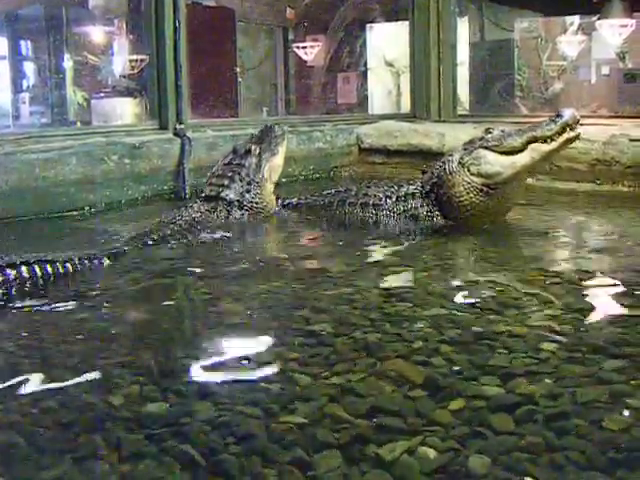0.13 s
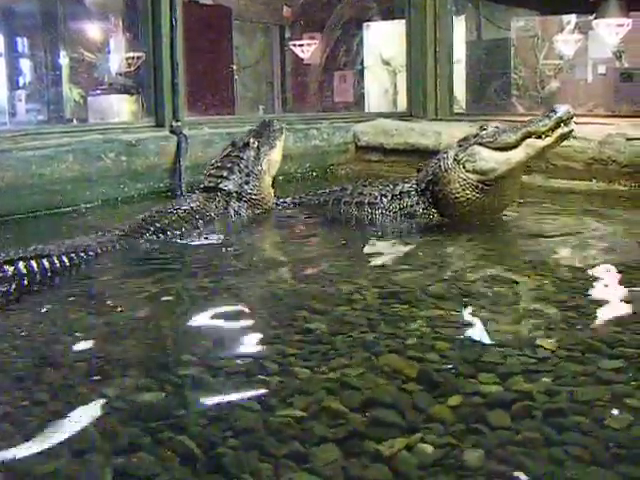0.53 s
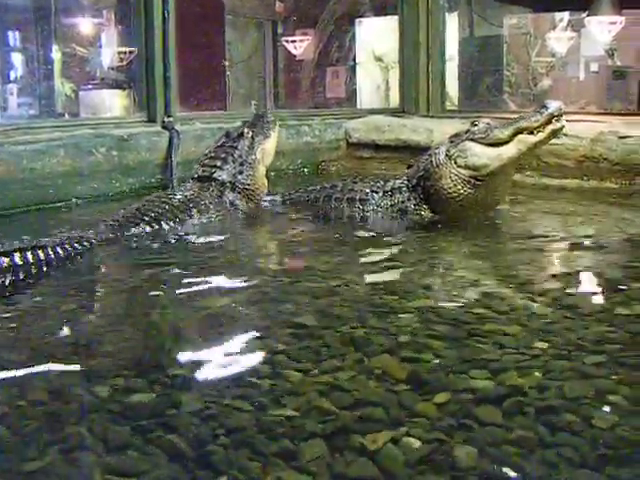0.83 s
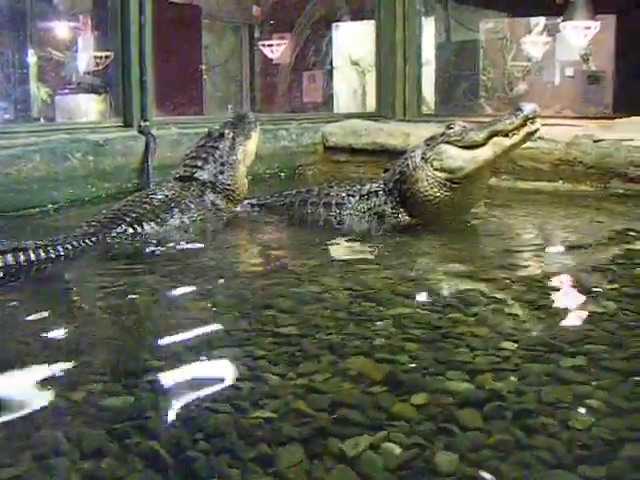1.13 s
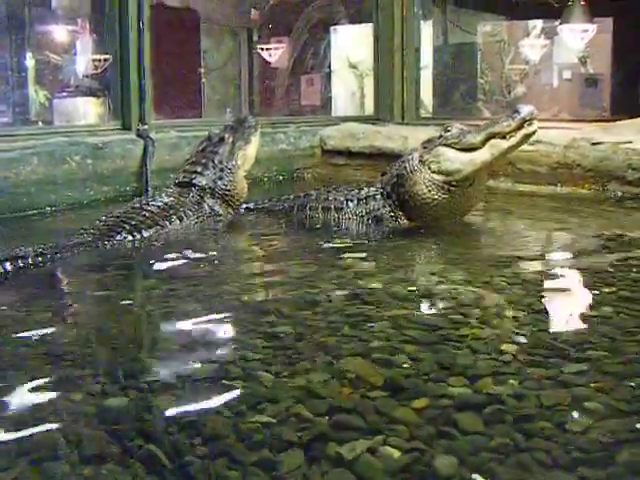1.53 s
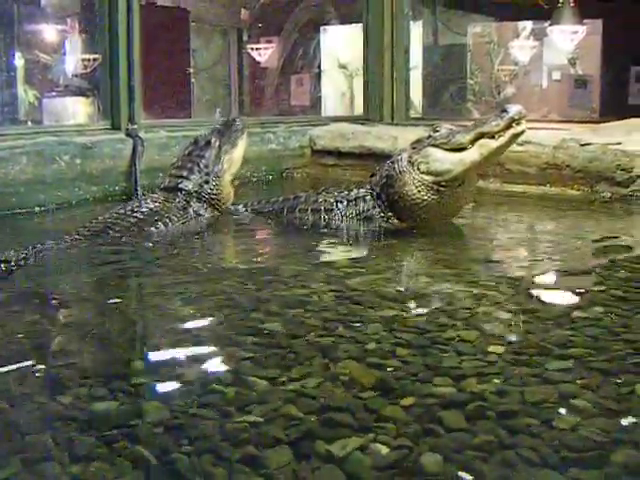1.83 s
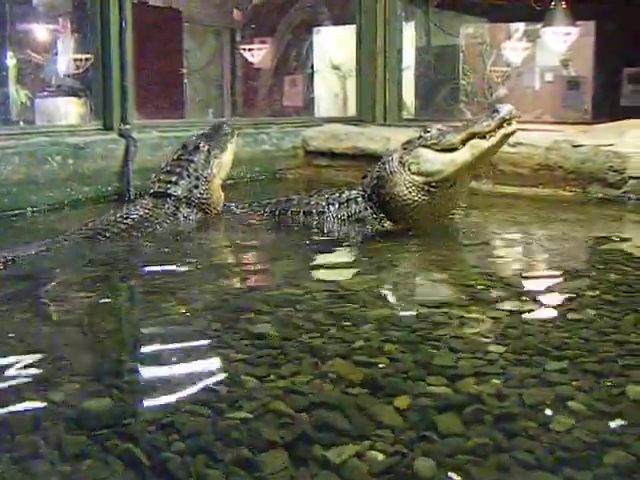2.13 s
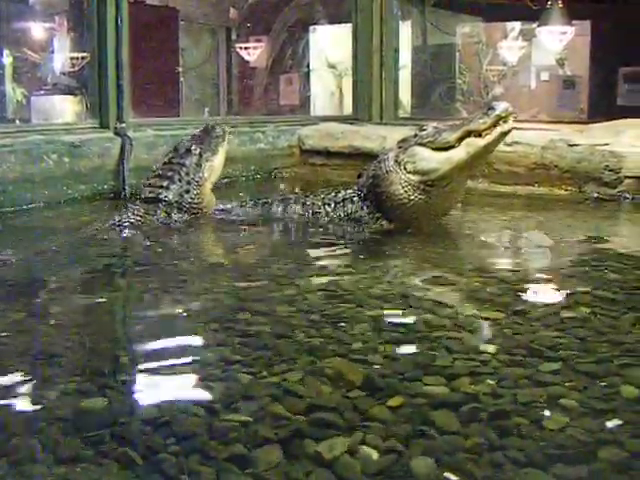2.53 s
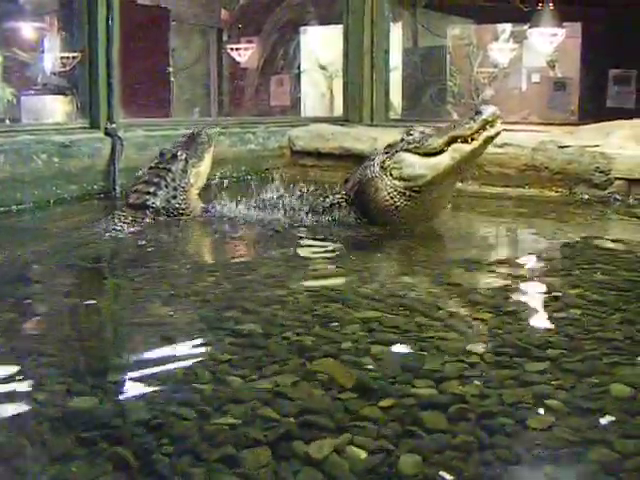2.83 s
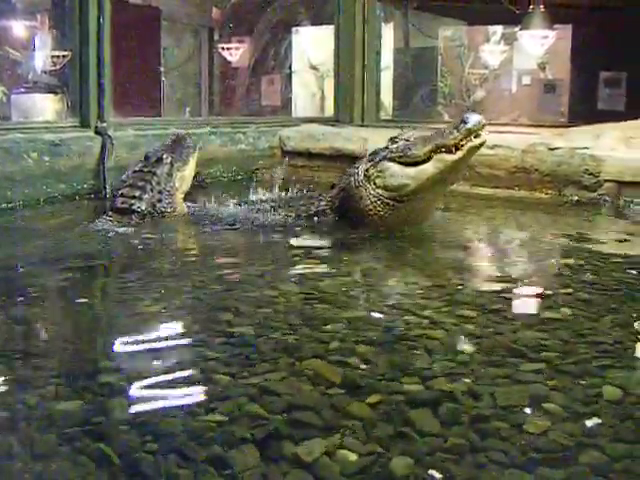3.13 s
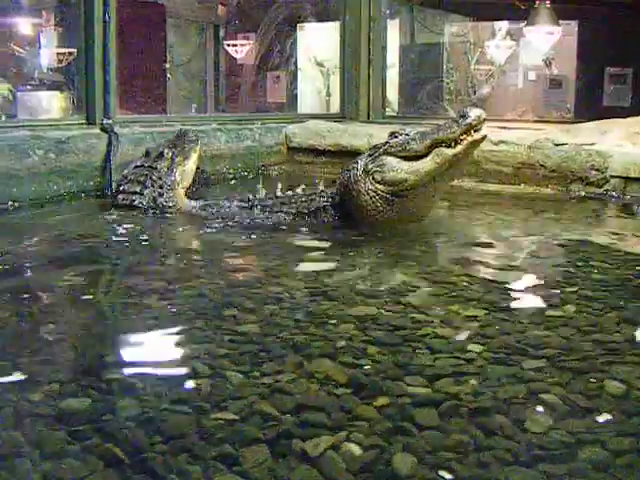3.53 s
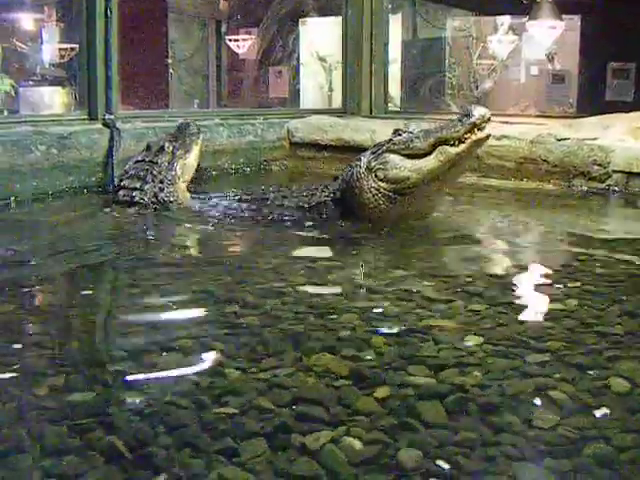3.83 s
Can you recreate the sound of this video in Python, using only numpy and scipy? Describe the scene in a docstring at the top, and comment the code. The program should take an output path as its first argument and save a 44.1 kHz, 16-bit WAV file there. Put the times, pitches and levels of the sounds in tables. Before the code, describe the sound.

An alligator's low, rough bellow builds after a stretch of steady trickling and sharp drips near the microphone. Water plops and fizzes over its throbbing body as the growl rises, sounding dull and slightly echoing in an indoor pool.

```python
"""An indoor pool, where water trickles steadily and a few sharp drips fall close by.
An alligator's body throbs very low, making the water dance and spatter over its back.
Then a hoarse tone in its throat swells into a slow growl, as pulses of air ring its chest and airway.
The water is made of tiny ringing bubbles and bursts of noise. The hall echoes the voice and the spray.
The sound is dull, with almost no treble above 6 kHz; a limiter dips loud moments and tall peaks clip."""
import sys
import numpy as np
from scipy import signal
from scipy.fft import rfft, irfft
from scipy.io import wavfile
from scipy.ndimage import uniform_filter1d, minimum_filter1d

SR = 44100
rng = np.random.default_rng(int(sys.argv[2]) if len(sys.argv) > 2 else 0)


def generate_wav(signal):
    """Clip the signal to [-1, 1] and save it as 16-bit WAV at the path in sys.argv[1]."""
    frames = np.transpose(np.atleast_2d(signal))
    scaled = np.clip(frames, -1, 1) * 32767
    pcm = np.round(scaled).astype(np.int16)
    wavfile.write(sys.argv[1], SR, pcm)


N = 176400
T = np.arange(N) / SR

# how long the hall takes to fade by 60 dB: pitch_hz, fade_s
HALL_FADE = [(150, 0.29), (800, 0.3), (5000, 0.12)]
# tone colour of the even wash of water and room noise: pitch_hz, relative_db
WASH_COLOUR = [(18, -10), (70, -18.5), (90, -14), (120, -17), (170, -13), (197, -9), (225, -10.5), (262, 1),
               (601, -0.5), (994, 3), (1090, -13), (1290, -15.5), (1880, -6.5), (4700, -11.5), (5600, -26),
               (7280, -34.5), (12300, -120)]
# steady resonances in the room's noise: pitch_hz, width_hz, level_db
ROOM_TONES = [(197.3, 13, -60.5), (400.2, 21, -53.5), (617.3, 24, -55.5), (1177, 91, -51.5),
              (1328, 76, -52), (2957, 330, -55)]
# loudness of the trickle: time_s, patter_db, gurgle_db
TRICKLE_LEVELS = [(0, -43, -40), (.12, -39, -44), (.19, -44, -41), (.27, -37.5, -58), (.35, -41, -44),
                  (.42, -39, -40.5), (.52, -44.5, -39.5), (.59, -40.5, -46), (.8, -45, -40),
                  (.96, -42.5, -38.5), (1.05, -37.5, -44), (1.22, -46, -51), (1.32, -41.5, -42),
                  (1.48, -38, -38), (1.63, -41.5, -46), (1.74, -49.5, -77), (1.96, -44.5, -56),
                  (2.07, -48.5, -46), (2.25, -46, -42), (2.45, -43.5, -57.5), (2.68, -42, -45),
                  (4.0, -62, -41.5)]
# tone colour of the trickle's patter: pitch_hz, relative_db
PATTER_COLOUR = [(300, -44), (1200, -12), (1900, -11), (2800, 0.5), (3400, -5.5), (4300, -1.5), (5300, -2),
                 (6000, -14)]
# close drips: start_s, crack_db, crack_hz, knock_db, knock_hz, bubble_db, bubble_hz
DRIPS = [(0.8285, -8, 5000, -17, 2300, -20, 1050), (0.9012, -11, 4700, -8, 2100, -45, 1000),
         (0.9027, -20, 4200, 1, 1380, -26, 1350), (.9038, -2, 4250, -9, 1500, -45, 1000),
         (1.0496, -19, 4700, -36, 2500, -53, 1300), (1.505, -16, 4900, -37, 1700, -29, 800),
         (1.5091, .8, 4950, -7, 1900, -20, 840), (2.9535, -6.5, 4700, -10, 1000, -28, 785),
         (3.278, -10, 4520, -20, 2800, -23, 1295)]
# plops of slopping water: start_s, level_db, pitch_hz
PLOPS = [(.414, -26, 1303), (.875, -26, 994), (1.121, -25.5, 1287), (1.285, -29.5, 1286),
         (1.407, -25, 1295), (1.461, -27, 1316), (1.678, -31.5, 1300), (1.748, -30.5, 1410),
         (2.242, -22, 1056), (2.603, -23.5, 1316), (2.703, -13, 752), (2.726, -13, 862),
         (2.737, -15.5, 798), (2.835, -10.5, 800), (2.849, -11, 960), (2.865, -31, 795),
         (2.909, -20.5, 1030), (3.345, -25, 1310)]
# splashes falling back into the pool: start_s, level_db, pitch_hz, fade_s
SPLASHES = [(0.254, -35, 2980, 0.009), (0.987, -36, 2770, 0.021), (1.286, -32.5, 920, 0.036),
            (1.412, -31.5, 1170, 0.013), (1.99, -35, 3550, 0.04), (2.114, -37, 2700, .014),
            (2.175, -37, 3070, 0.021), (2.394, -38, 2870, 0.039), (2.723, -26, 2960, 0.015),
            (2.788, -31.5, 2510, 0.048), (2.835, -21, 960, 0.021), (2.837, -25, 3620, 0.012),
            (2.904, -25.5, 3800, 0.012), (2.947, -16, 2700, 0.0034), (3.126, -29.5, 1450, 0.025),
            (3.227, -25, 2080, 0.023), (3.34, -30.5, 1230, 0.098), (3.438, -26, 2300, 0.017)]
# loudness of the dancing water: time_s, fizz_db, bubbles_db
SPRAY_LEVELS = [(2.68, -70.5, -50), (2.73, -45, -44), (2.78, -38.5, -40), (2.81, -34, -32.5),
                (2.86, -33.5, -32), (2.93, -32.5, -36.5), (3.0, -33.5, -36), (3.14, -30.5, -42.5),
                (3.27, -37.5, -35), (3.45, -34.5, -44), (3.56, -30.5, -37.5), (3.68, -42.5, -43.5),
                (3.82, -39.5, -38), (4.0, -37, -41)]
# tone colour of the fine spray: pitch_hz, relative_db
FIZZ_COLOUR = [(300, -23.5), (1200, -15.5), (1900, -9.5), (2800, 9.5), (3400, 4), (4300, 9.5), (5300, 2.5),
               (6000, -4)]
# hiss of the finest mist at the height of the bellow: time_s, level_db
MIST_LEVELS = [(3.7, -63), (3.765, -40), (3.795, -31.5), (3.83, -47), (3.865, -53), (3.905, -32),
               (4.0, -40)]
# deep throb of the body, pitched at four times its shaking rate: time_s, pitch_hz, level_db
THROB = [(2.38, 63.64, -81), (2.56, 68.6, -55.5), (2.75, 71.5, -55), (3.05, 76.2, -49.5),
         (3.4, 81.3, -53.5), (3.7, 92, -67), (3.83, 85.2, -54.5), (3.92, 88, -54), (4.0, 88, -43)]
# loudness of the parts of the voice: time_s, throat_db, chest_db, hum_db, mouth_db, airway_db
VOICE_LEVELS = [(2.85, -31.5, -52, -52.5, -49, -67), (3.05, -30.5, -52, -47, -46.5, -39),
                (3.27, -29, -45.5, -45.5, -45, -35), (3.5, -31.5, -49.5, -42.5, -34.5, -30),
                (3.56, -19.5, -40.5, -41, -31.5, -35.5), (3.597, -28, -41, -32, -30, -33),
                (3.608, -16, -33.5, -34, -25.5, -37), (3.71, -15.5, -26, -30.5, -35.5, -38),
                (3.78, -18.5, -22.5, -24.5, -39, -34), (3.83, -23.5, -23, -38, -36, -35.5),
                (3.855, -17, -22, -39, -38, -39.5), (3.94, -24.5, -22, -39, -35.5, -32.5),
                (4.0, -39, -24.5, -41, -39, -48)]
# speed of the growl: time_s, pulses_per_s
GROWL_RATE = [(3.61, 53), (3.66, 43.5), (3.83, 39), (3.845, 49), (3.92, 46), (4.0, 45)]
# hoarseness of the voice: time_s, noise_share (0 to 1)
HOARSENESS = [(2.8, .6), (3.45, .55), (3.58, .2), (3.75, .18), (4.0, .11)]
# centre of the throat tone: time_s, pitch_hz
THROAT_PITCH = [(2.8, 768), (3.56, 751.2), (3.626, 750.4), (3.698, 740.5), (3.76, 729.5), (3.82, 707.8),
                (3.86, 717.6), (3.91, 678), (4.0, 700)]
# throat resonances: ratio_to_throat_pitch, width_hz, relative_db
THROAT_RESONANCES = [(.915, 100, -1.5), (1.05, 105, 0)]
# chest resonances: pitch_hz, width_hz, relative_db
CHEST_RESONANCES = [(268, 125, -5), (369, 132, -5), (494, 200, -19)]
# mouth resonances: pitch_hz, width_hz, relative_db
MOUTH_RESONANCES = [(1438, 97, -3.5), (1537, 110, 9.5)]
# high resonances of the airway: pitch_hz, width_hz, relative_db
AIRWAY_RESONANCES = [(2600, 200, -7), (3110, 170, 2.5), (3610, 130, 3), (4125, 150, 2), (4880, 330, .5),
                     (5310, 170, -2), (5720, 130, -8)]
# first echoes of the bellow from the water and the pool wall: delay_s, gain
ECHOES = [(.0043, 0.11), (.0062, 0.23), (.0103, .18)]

BELLOW_START_S, BELLOW_RISE_S, GROWL_START_S = 2.68, 0.17, 3.6


def amp(db):
    """Turns decibels into a gain."""
    return 10 ** (np.asarray(db) / 20)


def unit(x):
    """Scales a signal to an average power of 1."""
    return x / np.sqrt(np.mean(x ** 2) + 1e-20)


def noise(length=N):
    """An even hiss (white noise)."""
    return rng.standard_normal(length)


def drift(seconds):
    """A smooth random wobble; more seconds make it slower."""
    size = max(1, int(seconds * SR))
    return unit(uniform_filter1d(uniform_filter1d(noise(), size), size))


def curves(table):
    """Turns each column after the time into a curve over the whole scene."""
    times, *columns = np.transpose(table)
    return [np.interp(T, times, column) for column in columns]


def at_pitch(table, hz):
    """Looks up a table's value at a pitch, sliding between its rows."""
    pitches, values = np.transpose(table)
    return np.interp(np.log(hz + 1), np.log(pitches), values)


def colour(x, table):
    """Gives a sound a tone colour by turning each pitch up or down."""
    return unit(irfft(rfft(x) * amp(at_pitch(table, np.fft.rfftfreq(N, 1 / SR))), N))


def add(mix, start_s, sound):
    """Mixes a sound in at a given time."""
    part = mix[round(start_s * SR):][:len(sound)]
    part += sound[:len(part)]


def lowpass(x, hz):
    """Cuts away the treble above a pitch."""
    return signal.oaconvolve(x, signal.firwin(255, hz, window=("kaiser", 9), fs=SR), "same")


def resonate(x, hz, width_hz, order=3):
    """Rings around a pitch that may move; white noise comes out as strong as it went in."""
    spin = np.exp(2j * np.pi * np.cumsum(hz * np.ones(N)) / SR)
    decay = np.exp(-np.pi * width_hz / SR)
    b, a = [(1 - decay) ** order], np.poly([decay] * order)
    ring = signal.lfilter(b, a, np.arange(SR // 10) == 0)
    band = spin * signal.lfilter(b, a, x / spin + 1e-18)  # shift down to 0 Hz, smooth, shift back
    return np.sqrt(2) * band.real / np.linalg.norm(ring)


def cavity(x, resonances, scale=1):
    """A hollow space rings at several pitches, each multiplied by scale."""
    return unit(sum((-1) ** k * amp(db) * resonate(x, hz * scale, width_hz)
                    for k, (hz, width_hz, db) in enumerate(resonances)))


def bubbles(per_s, low_hz, high_hz, cycles, spread_db, kinds=28):
    """A random rain of small ringing bubbles, each rising a little in pitch."""
    strength = amp(spread_db * np.minimum(rng.exponential(1, N), 4))
    pops = strength * (rng.random(N) < per_s / SR) * rng.choice([-1, 1], N)
    kind, out = rng.integers(0, kinds, N), np.zeros(N)
    for k, hz in enumerate(np.geomspace(low_hz, high_hz, kinds)):
        age = np.arange(0, 5, hz / SR / cycles)  # counted in fade times
        envelope = (1 - np.exp(-age * cycles)) * np.exp(-age)
        ring = envelope * np.sin(2 * np.pi * cycles * age * (1 + 0.011 * age))
        out += signal.oaconvolve(pops * (kind == k), ring * np.sqrt(hz))[:N]
    return unit(out)


def surging(x, depth_db, clump_s=0.012):
    """Water comes in clumps: patches of neighbouring pitches swell and fade."""
    spectrum = signal.stft(x, nperseg=256)[2]
    patches = uniform_filter1d(noise(spectrum.shape[::-1]), int(clump_s * SR / 128), axis=0)
    patches = unit(uniform_filter1d(patches, size=7, axis=1)).T
    return unit(signal.istft(spectrum * amp(depth_db * patches), nperseg=256)[1][:N])


def hall(x):
    """Sound bounces off glass and stone, and the treble dies first."""
    hz, t, spectrum = signal.stft(noise(SR) * (np.arange(SR) > 300), SR, nperseg=256)
    fade = amp(-60 * t / at_pitch(HALL_FADE, hz)[:, None])
    tail = signal.istft(spectrum * fade, SR, nperseg=256)[1]
    return signal.fftconvolve(x, tail / np.linalg.norm(tail))[:N]


def near_echoes(x):
    """Echoes from nearby surfaces fill the gaps between the growl's pulses."""
    out = x.copy()
    for delay_s, gain in ECHOES:
        add(out, delay_s, gain * x)
    return out / np.sqrt(1 + sum(gain ** 2 for _, gain in ECHOES))


def trickle():
    """Running water: an even wash with the room's tones, a fine patter and a gurgle of bubbles."""
    patter_gain, gurgle_gain = map(amp, curves(TRICKLE_LEVELS))
    room_noise = noise()
    room = sum(amp(db) * resonate(room_noise, hz, width_hz) for hz, width_hz, db in ROOM_TONES)
    wash = amp(-43) * colour(noise(), WASH_COLOUR)
    ticks = bubbles(per_s=5300, low_hz=1850, high_hz=5300, cycles=1.6, spread_db=-0.5)
    patter = surging(colour(ticks, PATTER_COLOUR), depth_db=3.5)
    gurgle = bubbles(per_s=590, low_hz=546, high_hz=1697, cycles=4.3, spread_db=3.2)
    return wash + room + patter_gain * patter + gurgle_gain * gurgle


def cut_bass(x, hz=426):
    """Small bodies of water give off no bass."""
    return signal.sosfilt(signal.butter(4, hz, "high", fs=SR, output="sos"), x)


def drips(crack_s=0.00034, knock_s=0.00035, ring_s=0.0077):
    """Each close drop lands with a bright crack, a duller knock and a small ringing bubble."""
    out, t = np.zeros(N), np.arange(2000) / SR
    for start_s, crack_db, crack_hz, knock_db, knock_hz, bubble_db, bubble_hz in DRIPS:
        snap = amp(-0.5) * noise(len(t))
        crack = (np.sin(2 * np.pi * crack_hz * t) + snap) * t / crack_s * np.exp(1 - t / crack_s)
        knock = np.sin(2 * np.pi * knock_hz * t) * t / knock_s * np.exp(1 - t / knock_s)
        bubble = np.sin(2 * np.pi * bubble_hz * t) * np.exp(-t / ring_s)
        add(out, start_s, amp(crack_db) * crack + amp(knock_db) * knock + amp(bubble_db) * bubble)
    return cut_bass(out)


def plops(fade_s=0.0048, rise_per_s=4.4):
    """A pocket of air rings briefly amid the slop of the water around it."""
    out, t = np.zeros(N), np.arange(3000) / SR
    envelope = (1 - np.exp(-t / 0.00077)) * np.exp(-t / fade_s)
    for start_s, db, hz in PLOPS:
        slop = 0.71 * unit(uniform_filter1d(noise(len(t)), 70))
        phase = 2 * np.pi * hz * t * (1 + rise_per_s * t / 2)
        add(out, start_s, amp(db) * envelope * (np.sin(phase) + slop * np.cos(phase)))
    return cut_bass(out)


def splashes(edge_ratio=1.29):
    """Water falls back into the pool in short bursts of noise."""
    out, t = np.zeros(N), np.arange(8000) / SR
    for start_s, db, hz, fade_s in SPLASHES:
        band = signal.butter(2, [hz / edge_ratio, hz * edge_ratio], "band", fs=SR, output="sos")
        envelope = (1 - np.exp(-t / 0.00045)) * np.exp(-t / fade_s)
        add(out, start_s, amp(db) * envelope * unit(signal.sosfilt(band, noise(len(t)))))
    return out


def shaking(depth, crest_s):
    """A gain that swings with each shake of the body, with one crest at crest_s."""
    shakes = np.cumsum(curves(THROB)[0]) / SR / 4
    return unit(1 + depth * np.cos(2 * np.pi * (shakes - np.interp(crest_s, T, shakes))))


def spray():
    """Water leaps from the shaking back as a pulsing fizz, bubbles and a late hiss of mist."""
    fizz_gain, bubble_gain = map(amp, curves(SPRAY_LEVELS))
    mist_gain = amp(curves(MIST_LEVELS)[0]) * (T > MIST_LEVELS[0][0])
    fine = bubbles(per_s=9000, low_hz=1300, high_hz=5800, cycles=5, spread_db=2)
    fizz = shaking(depth=0.51, crest_s=3.037) * surging(colour(fine, FIZZ_COLOUR), depth_db=2.2)
    coarse = bubbles(per_s=1800, low_hz=800, high_hz=2300, cycles=6, spread_db=2)
    mist = unit(resonate(fine, hz=4950, width_hz=1100))
    return fizz_gain * fizz + bubble_gain * coarse + mist_gain * mist


def throb():
    """The body shakes unevenly about 20 times a second; we hear tones at 3, 4 and 5 times that rate."""
    hz, db = curves(THROB)
    phase = 2 * np.pi * np.cumsum(hz) / SR
    tones = 0.2 * np.sin(phase * 3 / 4) + np.sin(phase) + 0.25 * np.sin(phase * 5 / 4)
    rumble = 0.87 * resonate(noise(), hz, width_hz=290)
    return amp(db) * unit(tones + rumble) * (T > THROB[0][0])


def roughen(clean, noisy):
    """Blends a clean sound with a noisy one, following the hoarseness of the voice."""
    share = np.clip(curves(HOARSENESS)[0], 0, 1)
    return np.sqrt(1 - share) * clean + np.sqrt(share) * noisy


def breath(cycles, rate, uneven_db=0.6, puff_cycles=0.26):
    """Each cycle of the growl lets out a sharp pulse and a fading puff of air."""
    starts = np.diff(np.floor(cycles), prepend=np.floor(cycles[0]))
    pulses = starts * np.sqrt(SR / rate) * amp(uneven_db * noise())
    puffs = unit((0.16 + np.exp(-(cycles % 1) / puff_cycles)) * noise())
    return roughen(pulses, puffs)


def throat_tone(cycles, lag_cycles=0.06, waver=0.045):
    """A hoarse, wavering tone surges as each cycle opens the throat."""
    hz = curves(THROAT_PITCH)[0]
    opening = 1 + 0.58 * np.cos(2 * np.pi * (cycles - lag_cycles))
    phase = 2 * np.pi * np.cumsum(hz * (1 + waver * drift(0.004))) / SR
    tone = unit(opening * np.sin(phase))
    rasp = cavity(noise(), THROAT_RESONANCES, scale=hz)
    # the shaking body pumps the tone until the growl takes over
    before_growl = np.clip((GROWL_START_S - T) / 0.18, 0, 1)
    pump = 1 + (shaking(depth=0.62, crest_s=2.7) - 1) * before_growl
    return pump * roughen(tone, rasp)


def bellow(extra_air=0.69, wander=0.006):
    """The throat sounds its tone while pulsing breath rings the chest, a low hum, the mouth and airway."""
    throat_gain, chest_gain, hum_gain, mouth_gain, airway_gain = map(amp, curves(VOICE_LEVELS))
    rate = curves(GROWL_RATE)[0]
    cycles = np.cumsum(rate) / SR
    cycles -= np.interp(GROWL_START_S, T, cycles)  # a pulse lands just as the growl starts
    air = breath(cycles, rate)
    throat = throat_gain * throat_tone(cycles)
    chest = chest_gain * cavity(air, CHEST_RESONANCES)
    hum = hum_gain * resonate(air, hz=197.5, width_hz=52.4)
    mouth = mouth_gain * cavity(air, MOUTH_RESONANCES)
    hissy_air = air + extra_air * noise()
    airway = airway_gain * cavity(hissy_air, AIRWAY_RESONANCES, scale=1 + wander * drift(0.043))
    fade_in = np.clip((T - BELLOW_START_S) / BELLOW_RISE_S, 0, 1)
    return fade_in * (throat + chest + hum + mouth + airway)


def scene():
    """The alligator and the water in the hall, with the drips close by."""
    voice = near_echoes(bellow())
    water = spray() + splashes() + plops()
    direct = voice + throb() + water + trickle() + drips()
    return (direct + hall(amp(-10) * voice + amp(-9) * water))[None]


def record(dry, limit_db=-12, hold_s=0.038, smooth_s=0.0056):
    """A limiter dips loud moments, treble above about 6 kHz is cut, and the tallest peaks clip."""
    power_db = 10 * np.log10(signal.lfilter(np.ones(130) / 130, 1, dry[0] ** 2) + 1e-12)
    over_db = np.maximum(power_db - limit_db, 0)
    half_hold = int(hold_s * SR / 2)
    held_db = -minimum_filter1d(-over_db, 2 * half_hold + 1, origin=half_hold)  # biggest recent excess
    decay = np.exp(-1 / (smooth_s * SR))
    limited = dry[0] / amp(signal.lfilter([1 - decay], [1, -decay], held_db))
    dull = lowpass(np.clip(limited, -1, 1), hz=5950)
    return lowpass(np.clip(dull, -0.74, 0.74), hz=16500)[None]  # clipping adds a faint snap


dry = scene()
out = record(dry)
generate_wav(out)
```